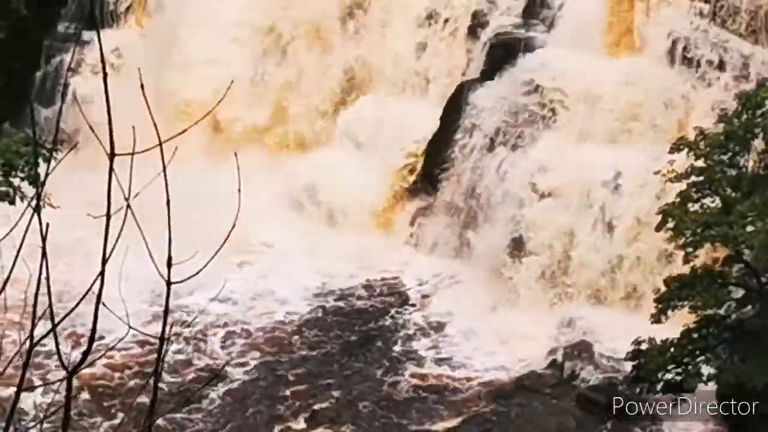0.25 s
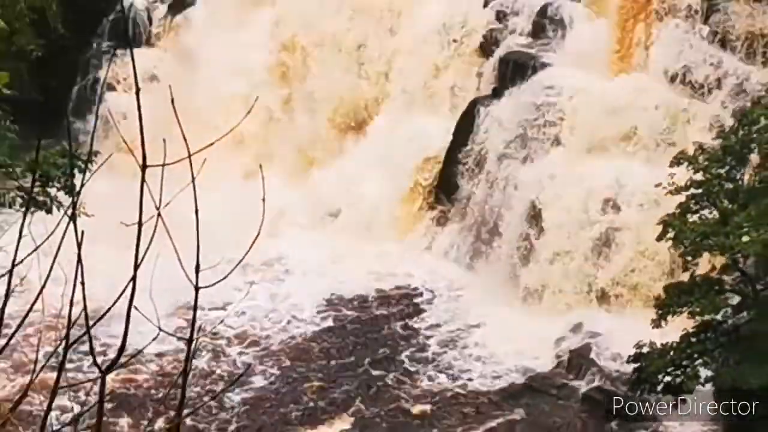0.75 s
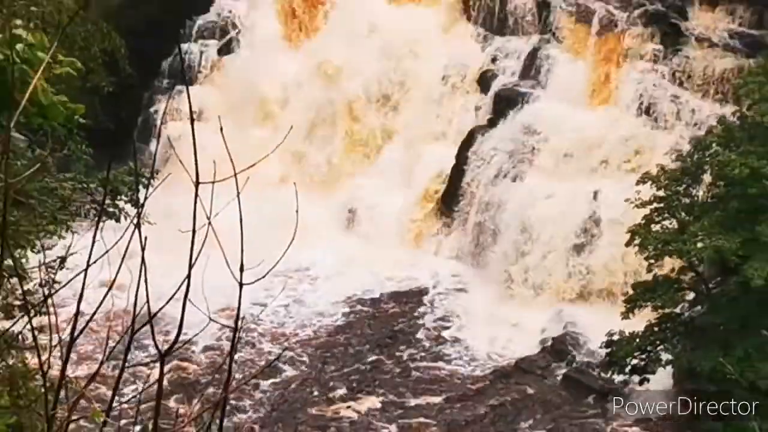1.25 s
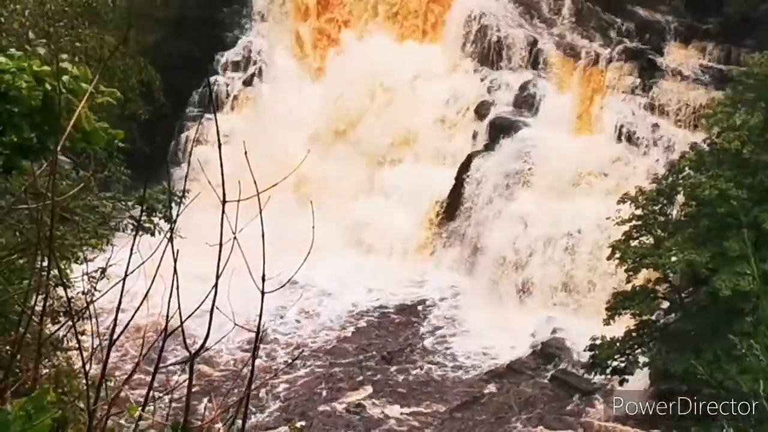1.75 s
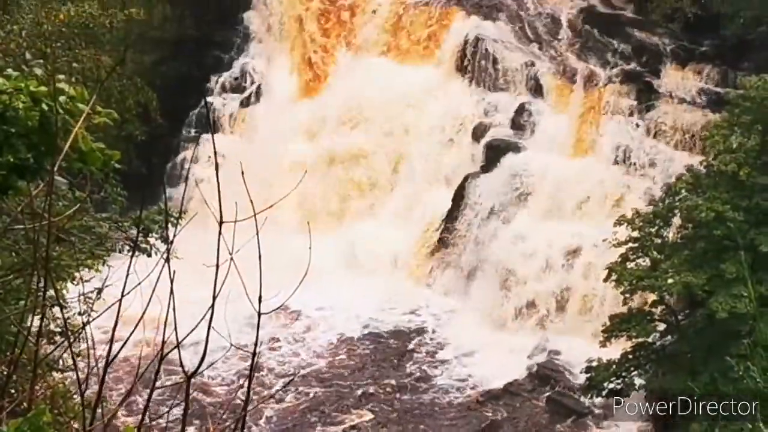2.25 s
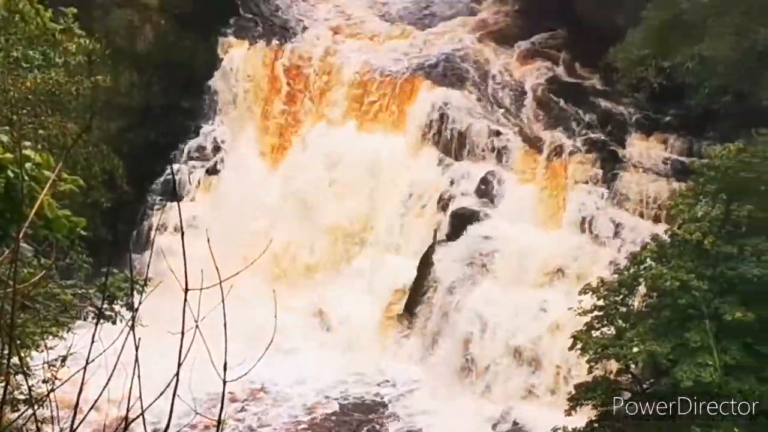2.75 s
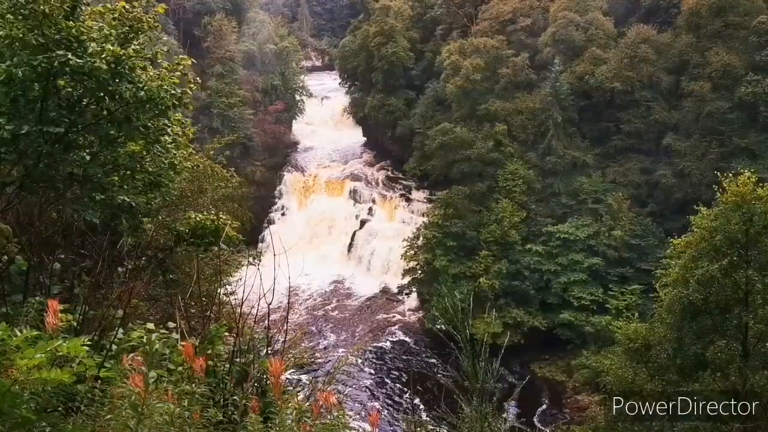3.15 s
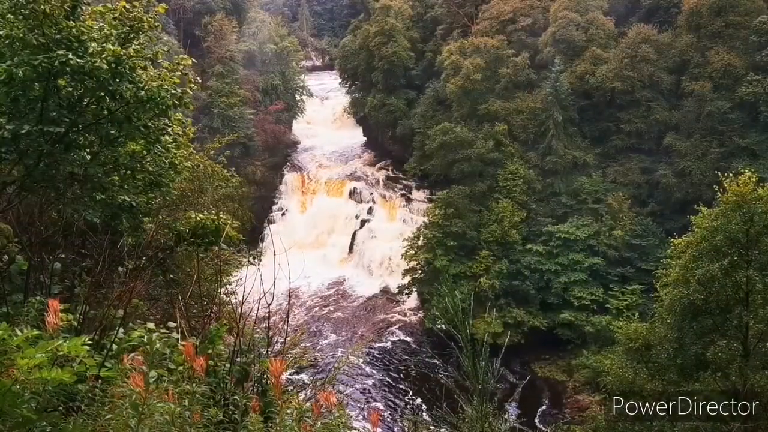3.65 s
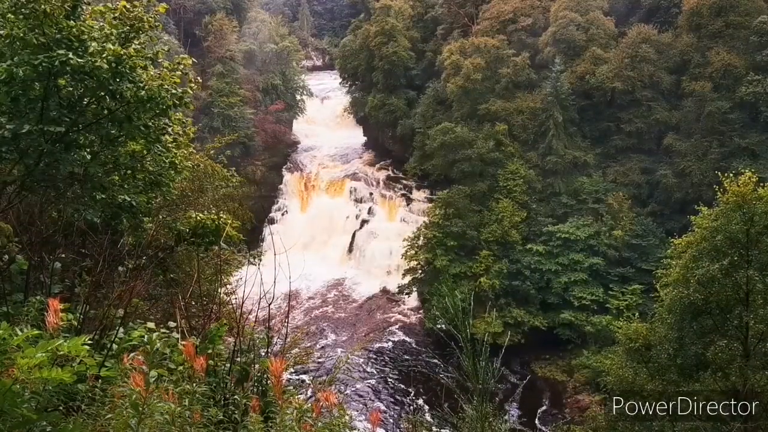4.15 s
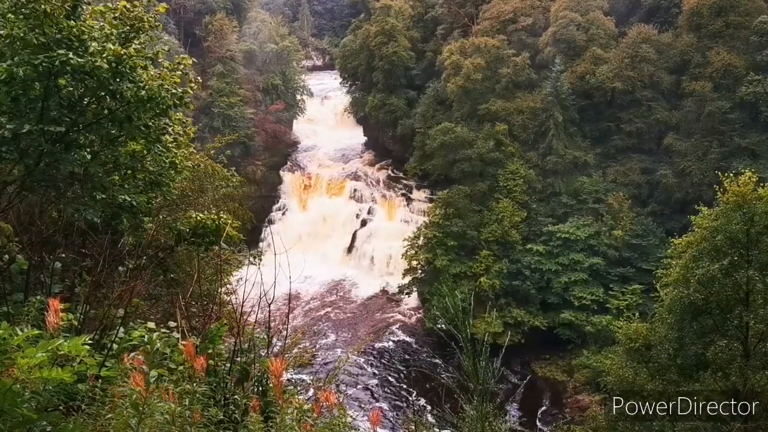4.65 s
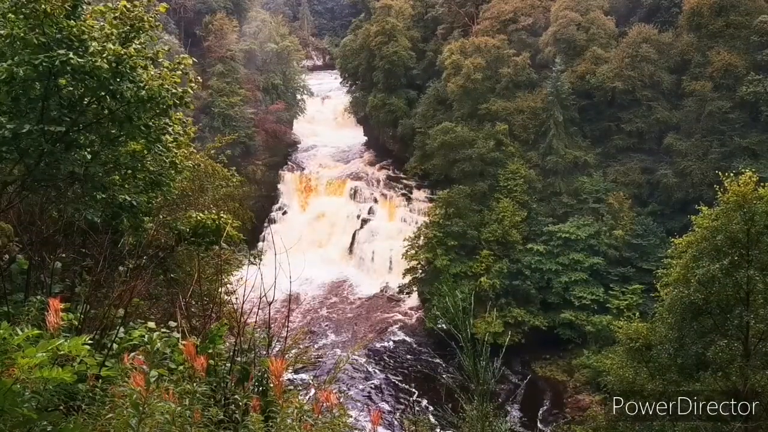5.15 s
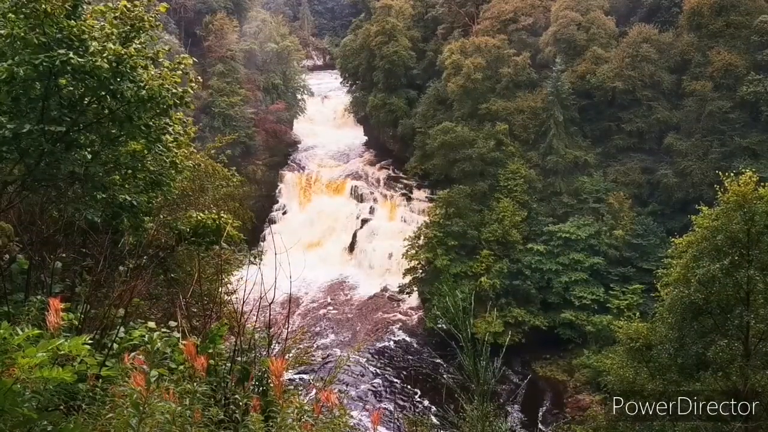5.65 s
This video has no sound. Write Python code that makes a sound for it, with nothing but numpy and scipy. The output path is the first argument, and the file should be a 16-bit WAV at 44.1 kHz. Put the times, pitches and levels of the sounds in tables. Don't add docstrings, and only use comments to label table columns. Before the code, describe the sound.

A heavy waterfall roars steadily with bright hissing spray, cuts abruptly to a brief silence, then the same rush resumes almost unchanged.

```python
import sys
import numpy as np
from scipy import signal
from scipy.fft import rfft, irfft, next_fast_len
from scipy.io import wavfile
from scipy.ndimage import uniform_filter1d, map_coordinates

SR = 44100
rng = np.random.default_rng(int(sys.argv[2]) if len(sys.argv) > 2 else 0)


def dump(signal):
    limited = np.clip(np.atleast_2d(signal).T, -1, 1)
    pcm = np.round(limited * 32767).astype(np.int16)
    wavfile.write(sys.argv[1], SR, pcm)


def voltage_ratio(level):
    return 10 ** (np.asarray(level, float) / 20)


N = 260631

# (frequency [Hz], density [dB per Hz])
POOL_LEFT_1 = [(10, -9.6), (42, -3.2), (78, -7.2), (128, -1.8), (165, -3.2), (200, -9.1), (262, -4.6),
               (320, -7.1), (410, -3.9), (520, -9.3), (750, -12.6), (1000, -14.3), (1250, -17.4),
               (1490, -19.7)]
POOL_RIGHT_1 = [(10, -12.3), (42, -7.0), (78, -9.3), (128, -3.9), (165, -7.2), (200, -10.3), (262, -6.2),
                (320, -7.3), (410, -3.1), (520, -5.4), (750, -7.6), (1000, -11.8), (1250, -9.9),
                (1490, -12.2)]
POOL_LEFT_2 = [(10, -9.9), (42, -1.3), (78, -7.5), (128, 0.3), (165, -4.4), (200, -8.2), (262, -3.8),
               (320, -7.7), (410, -5.3), (520, -10.7), (750, -12.0), (1000, -14.3), (1250, -15.7),
               (1490, -20.3)]
POOL_RIGHT_2 = [(10, -13.0), (42, -5.0), (78, -9.4), (128, -2.3), (165, -8.9), (200, -9.0), (262, -5.8),
                (320, -6.8), (410, -3.4), (520, -8.7), (750, -7.9), (1000, -12.5), (1250, -14.4),
                (1490, -15.2)]
# (frequency [Hz], density [dB per Hz])
SPRAY_L_1 = [(1450, -19), (3750, -24), (4650, -22.5), (5560, -27), (6980, -28), (7880, -31.5), (9040, -30),
             (9430, -35), (13000, -51.5), (14600, -60), (15100, -70), (15200, -72.5), (15400, -85.5),
             (15500, -88.5)]
SPRAY_R_1 = [(1450, -12), (1780, -12.5), (2260, -6.5), (2680, -18.5), (3040, -19), (3360, -24.5),
             (6980, -22.0), (8010, -31), (9820, -35.5), (10600, -30.5), (13600, -45.5), (14100, -48),
             (14900, -50.5), (15500, -65)]
SPRAY_L_2 = [(1450, -23), (1710, -19), (3490, -22.5), (3620, -23.5), (4780, -23), (5040, -25),
             (5940, -27.5), (6980, -27), (7620, -32), (8790, -30), (13400, -51), (13800, -56),
             (15000, -54.5), (15500, -73.5)]
SPRAY_R_2 = [(1450, -16), (1970, -17.5), (2200, -14.5), (3750, -24.5), (5430, -21.9), (6200, -27),
             (6850, -22), (7880, -31.5), (10300, -33.5), (10600, -31.5), (13300, -45), (14000, -52),
             (14900, -44.5), (15500, -49)]
# (frequency [Hz], ratio [dB])
DIRECT_RATIO_1 = [(120, 21), (200, 11), (280, 19.5), (900, 4), (1400, -1.3), (4500, -1.5), (7000, -3.5),
                  (9500, -11)]
DIRECT_RATIO_2 = [(120, 20), (200, 9), (280, 14.5), (900, 3), (1400, -.7), (4500, -1.2), (7000, -4.5),
                  (9500, -11)]
# (frequency [Hz], lead of right over left [rad])
RIGHT_LEAD_1 = [(300, .15), (1200, 0.73), (1450, -0.6), (2250, 0.3), (2550, -2.5), (2850, 0.8),
                (5300, 0.64), (7500, -1.2)]
RIGHT_LEAD_2 = [(1100, -0.13), (2300, -0.23), (2650, -1), (3150, -.12), (3500, -0.55), (4900, -.15),
                (5700, -0.86), (7500, -.9)]
# (frequency [Hz], gain [dB])
TIPPED_TREBLE = [(8300, -0.5), (9200, 4), (10000, 0.5), (10800, -2), (12800, -2), (14200, 5), (15500, 15)]
# (frequency [Hz], threshold over neighbours [dB])
TREBLE_BAR = [(7000, -9), (9400, -8.5), (10600, -9), (11500, -2), (13500, -4.5)]

# (strength 0-1, first notch [Hz], notch spacing [Hz], fades above [Hz])
LEDGE_BOUNCE_1 = (0.73, 488, 783, 1320)
LEDGE_BOUNCE_2 = (0.53, 506, 753, 4000)
SPRAY_FROM_HZ, MIST_FROM_HZ, TOP_HZ = 1470, 13800, 15700
SIZE = next_fast_len(N + 8192)


def unit(x):
    return x / np.sqrt(np.mean(x ** 2) + 1e-20)


def along(points, hz):
    f, v = np.transpose(points)
    return np.interp(np.log(hz + 1), np.log(f + 1), v)


def wobble(rate):
    knots = rng.standard_normal(int(N * rate / SR) + 4)
    return map_coordinates(knots, [np.arange(N) * rate / SR])


def churn(patchy_db):
    z = signal.stft(rng.standard_normal((3, N)), nperseg=512)[2]
    patches = uniform_filter1d(rng.standard_normal(z.shape[1:]), size=8, axis=0)
    patches = uniform_filter1d(patches, size=9, axis=1)
    boiling = signal.istft(z * voltage_ratio(patchy_db * unit(patches)), nperseg=512)[1]
    return rfft(boiling[:, :N], SIZE)


def ledge_comb(hz, ledge):
    strength, notch_hz, spacing_hz, fade_hz = ledge
    echo = strength * np.exp(-(hz / fade_hz) ** 2)
    delayed = echo * np.exp(-2j * np.pi * (hz - notch_hz) / spacing_hz)
    return (1 - delayed) / np.sqrt(1 + echo ** 2)


def falls(roars, sprays, direct, lead, ledge, level_db, tilt):
    hz = np.fft.rfftfreq(SIZE, 1 / SR)
    direct_share = 1 / (1 + voltage_ratio(-2 * along(direct, hz)))
    turn = np.exp(0.5j * along(lead, hz))
    ahead, *around = churn(patchy_db=0.57)
    straight = np.sqrt(direct_share) * ledge_comb(hz, ledge) * ahead * [1 / turn, turn]
    field = straight + np.sqrt(1 - direct_share) * np.array(around)

    low = field * voltage_ratio([along(colour, hz) for colour in roars])
    high = field * voltage_ratio([along(colour, hz) for colour in sprays])
    tipped = high * [0 * hz, voltage_ratio(along(TIPPED_TREBLE, hz)) - 1]

    def heard(band):
        level_camera = irfft(high * band, SIZE)[:, :N]
        return level_camera + tilt * irfft(tipped * band, SIZE)[:, :N]

    roar = irfft(low * (hz < SPRAY_FROM_HZ), SIZE)[:, :N]
    spray = heard((hz >= SPRAY_FROM_HZ) & (hz < MIST_FROM_HZ))
    mist = heard((hz >= MIST_FROM_HZ) & (hz < TOP_HZ))
    loudness = np.sqrt(np.mean((roar + spray) ** 2))

    surge = 0.34 * wobble(2.4)
    roar = roar * voltage_ratio(surge + 0.16 * wobble(6))
    spray = spray * voltage_ratio(surge + 0.2 * wobble(11))
    mist = mist * voltage_ratio(-4.0 + 3 * wobble(30))
    return voltage_ratio(level_db) * (roar + spray + mist) / loudness


def thin_treble(x):
    hz, _, z = signal.stft(x, SR, nperseg=2048)
    power = abs(z) ** 2
    usual = uniform_filter1d(power.mean(axis=2), size=32, axis=1)[..., None]
    greed = rng.standard_normal((z.shape[1] // 16 + 1, z.shape[2]))
    greed = np.repeat(greed, 16, axis=0)[:z.shape[1]]
    bar_db = along(TREBLE_BAR, hz)[:, None] + 4.5 * greed
    below_treble = (hz < TREBLE_BAR[0][0])[:, None]
    kept = (power > usual * voltage_ratio(2 * bar_db)) | below_treble
    return signal.istft(z * kept, SR, nperseg=2048)[1][:, :N]


def scene():
    t = np.arange(N) / SR
    tilt = np.clip((t - 2.15) / 0.2, 0, 1)
    first = falls((POOL_LEFT_1, POOL_RIGHT_1), (SPRAY_L_1, SPRAY_R_1), DIRECT_RATIO_1,
                  RIGHT_LEAD_1, LEDGE_BOUNCE_1, level_db=-30, tilt=tilt)
    second = falls((POOL_LEFT_2, POOL_RIGHT_2), (SPRAY_L_2, SPRAY_R_2), DIRECT_RATIO_2,
                   RIGHT_LEAD_2, LEDGE_BOUNCE_2, level_db=-30.5, tilt=0 * t)
    stop_s, cut_s = 2.8738, 0.0006
    start_s, fade_in_s = 3.1408, 0.0022
    before = np.clip((stop_s - t) / cut_s, 0, 1)
    after = np.clip((t - start_s) / fade_in_s, 0, 1)
    return thin_treble(first) * before + thin_treble(second) * after


def band_limit(x):
    return signal.sosfilt(signal.butter(12, 15710, fs=SR, output="sos"), x)


def record(dry):
    return band_limit(dry)


dry = scene()
out = record(dry)
dump(out)
```